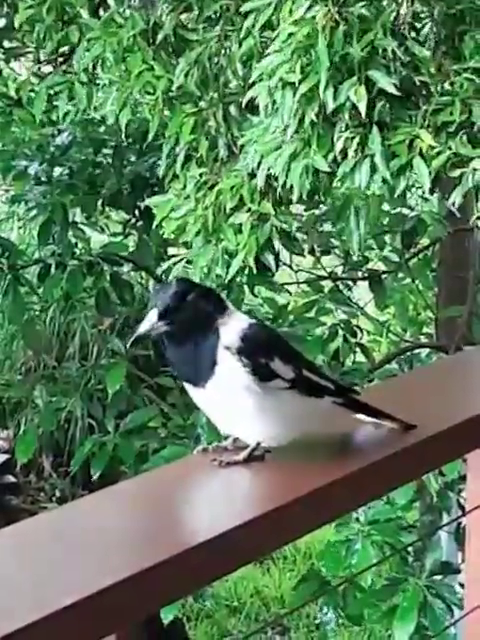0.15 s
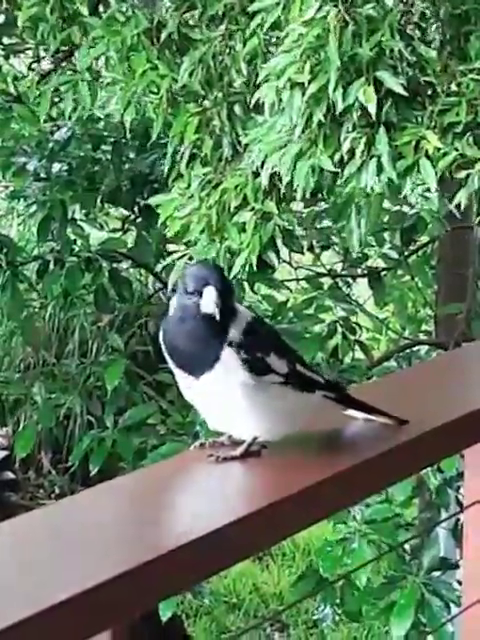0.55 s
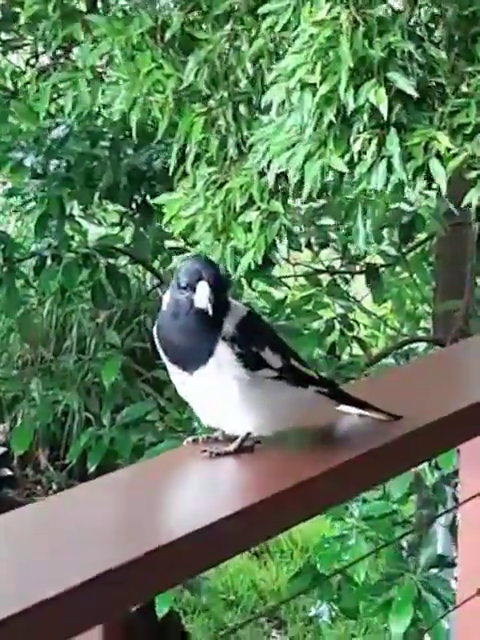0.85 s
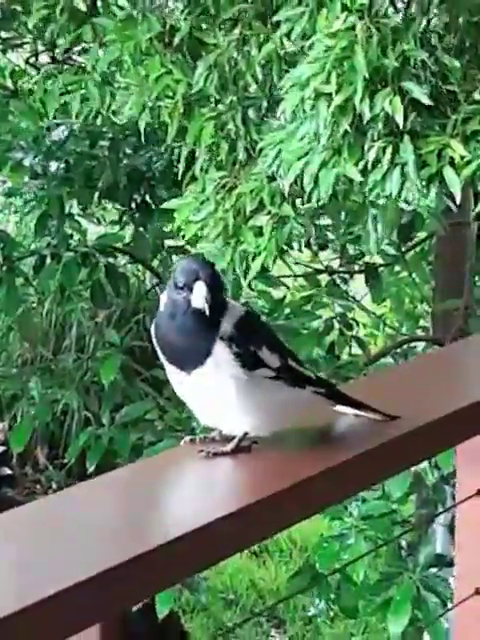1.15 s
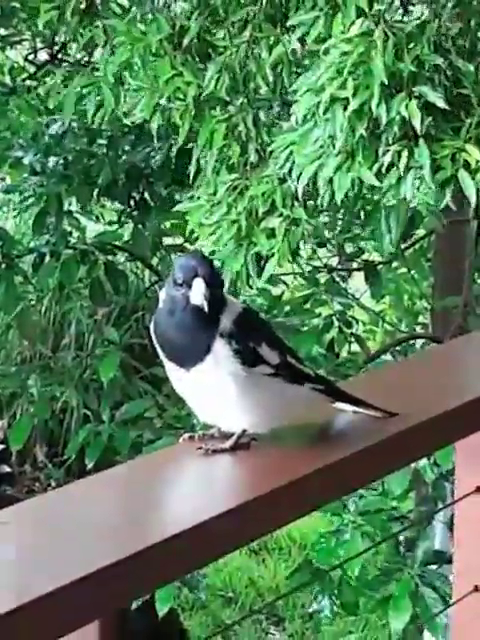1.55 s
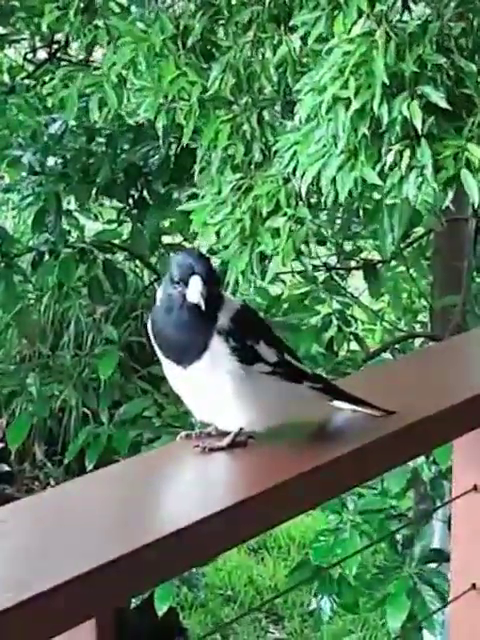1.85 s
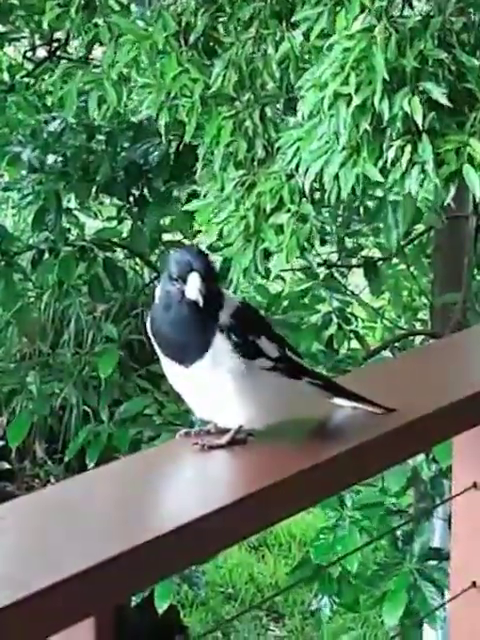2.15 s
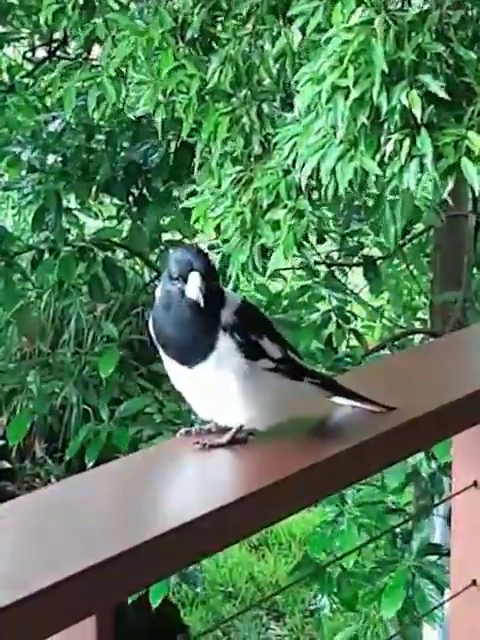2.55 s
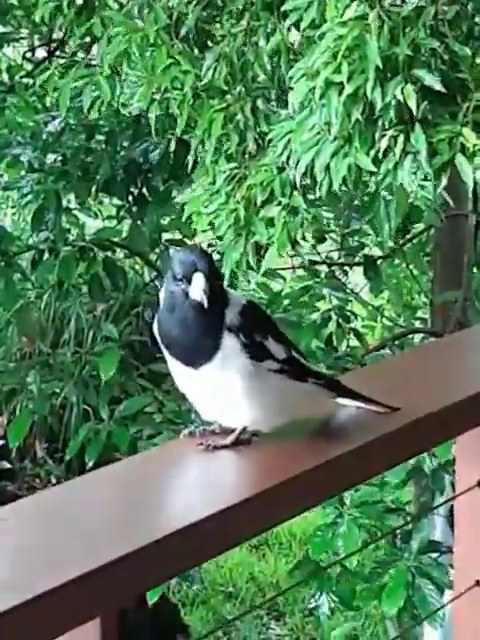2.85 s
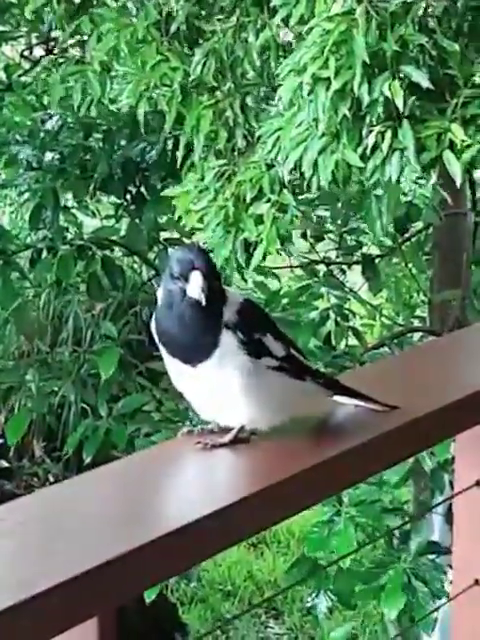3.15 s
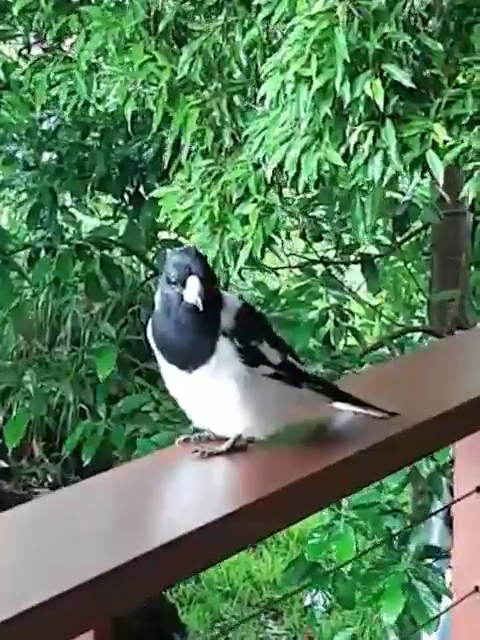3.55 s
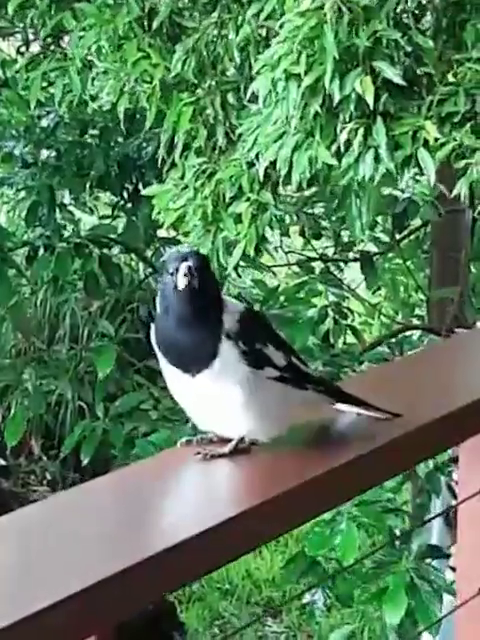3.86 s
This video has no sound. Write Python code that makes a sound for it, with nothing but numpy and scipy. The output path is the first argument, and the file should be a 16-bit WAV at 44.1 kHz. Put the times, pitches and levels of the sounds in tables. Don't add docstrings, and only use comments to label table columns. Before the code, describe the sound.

Bird whistling brief fluty notes on a veranda, ending in a raspy chirp, over distant road drone.

```python
import sys
import numpy as np
from scipy import signal
from scipy.fft import rfft, irfft
from scipy.io import wavfile
from scipy.ndimage import uniform_filter1d

SR = 44100
rng = np.random.default_rng(int(sys.argv[2]) if len(sys.argv) > 2 else 0)


def boost(x):
    u = np.asarray(x, float) / 20
    return 10 ** u


def waveform_to_disk(signal):
    frames = np.transpose(np.atleast_2d(signal))
    scaled = np.clip(frames, -1, 1) * 32767
    samples = np.round(scaled).astype(np.int16)
    wavfile.write(sys.argv[1], SR, samples)


N = 176400


def evened(x):
    return x / np.sqrt(np.mean(abs(x) ** 2) + 1e-20)


def resonate(x, hz, width):
    turn = np.exp(2j * np.pi * hz * np.arange(len(x)) / SR)
    r = np.exp(-np.pi * width / SR)
    return 2 * (turn * signal.lfilter([1 - r], [1, -r], x / turn)).real


def noise_band(hz, width):
    white = rng.standard_normal(N)
    return evened(resonate(resonate(white, hz, width), hz, width))


def slow(t, lo_hz, hi_hz):
    rates = np.geomspace(lo_hz, hi_hz, num=24)
    return evened(sum(np.sin(2 * np.pi * (f * t + rng.random())) / np.sqrt(f) for f in rates))


def fade(t, start, t60):
    return -60 * np.maximum(t - start, 0) / t60


# time in seconds, level in dB.
TRAFFIC_SWELL = [(0, -46), (.1, -46.5), (.25, -44), (.42, -46.5), (.7, -47), (.9, -46), (1.1, -47),
                 (1.3, -46), (1.5, -47), (1.8, -47), (2.1, -46), (2.4, -46), (2.75, -45.5), (3.05, -45.5),
                 (3.4, -47), (3.7, -46), (4, -47)]


def traffic(t):
    s, db = np.transpose(TRAFFIC_SWELL)
    return np.interp(t, s, db - db.mean())


# frequency in Hz, density in dB per Hz.
RUMBLE_SPECTRUM = [(18, -61), (30, -44), (53, -21.5), (130, -2.5), (250, -3), (412, -8), (560, -4),
                   (730, -34), (1230, -120)]
ROAD_SPECTRUM = [(330, -33), (560, -3), (684, -1.5), (1310, -2.5), (1550, 0.5), (1680, -3), (2030, -6.5),
                 (2330, -11), (2900, -13.5), (3770, -46), (6380, -120)]
LEAF_SPECTRUM = [(1710, -32), (2900, 0), (3340, -2.5), (3630, 0), (4150, 2.5), (5150, -3), (7310, -1.5),
                 (7760, -2.5), (8700, -23), (11300, -51), (19100, -120)]
AIR_SPECTRUM = [(5120, -32), (8700, 1), (11200, 2.5), (15500, -6)]
LAYER_EDGES_HZ = [15, 560, 2900, 8700, 15670]


def background():
    frames = N // 256 + 5
    hz = np.fft.rfftfreq(1024, 1 / SR)
    real, imag, patches = rng.standard_normal((frames, 513, 3)).T
    patches = uniform_filter1d(patches, size=10, axis=0)
    patches = evened(uniform_filter1d(patches, size=14, axis=1))
    t = np.arange(frames) * 256 / SR
    swell = slow(t, 0.4, 3.0)
    gusts = slow(t, 2.3, 40)
    # spectrum, level in dB, movement in dB
    layers = [
        (RUMBLE_SPECTRUM, -52, 1.73 * patches + 0.15 * swell),
        (ROAD_SPECTRUM, -46, 0.85 * patches + 0.18 * swell + traffic(t)),
        (LEAF_SPECTRUM, -52.5, 0.97 * patches + 0.1 * swell + 0.23 * gusts),
        (AIR_SPECTRUM, -68, 0.6 * patches + 0.88 * swell + 0.56 * gusts),
    ]
    out = np.zeros(N)
    for k, (spectrum, level_db, moving_db) in enumerate(layers):
        f, db = np.transpose(spectrum)
        inside = (hz >= LAYER_EDGES_HZ[k]) & (hz < LAYER_EDGES_HZ[k + 1])
        colour = boost(np.interp(np.log(hz + 1), np.log(f + 1), db)) * inside
        z = (real + 1j * imag) * colour[:, None] * boost(moving_db)
        layer = signal.istft(z, nperseg=1024, noverlap=768)[1][:N]
        out += boost(level_db) * evened(layer)
    return out


# centre in Hz, width in Hz, level in dB.
MACHINE_DRONES = [(1550, 62, -57), (2022, 106, -60), (250.5, 19.5, -63.5)]


def drones():
    t = np.arange(N) / SR
    out = np.zeros(N)
    for hz, width, db in MACHINE_DRONES:
        drift = slow(t[::64], 0.404, 3.57).repeat(64)[:N]
        out += boost(db + 1.4 * traffic(t) + 1.4 * drift) * noise_band(hz, width)
    return out


def leaf_crackle():
    per_second, level_db, low_cut_hz = 120, -78, 9000
    strength = boost(4.5 * np.minimum(rng.exponential(1, N), 4))
    clicks = strength * (rng.random(N) < per_second / SR)
    clicks = signal.lfilter(*signal.butter(2, low_cut_hz, "high", fs=SR), clicks)
    return boost(level_db) * evened(clicks)


# pitch in Hz, level in dB, 60 dB decay time in seconds.
CLAW_KNOCKS = [(615, -37.5, 0.094), (680, -38, 0.11), (602, -41, 0.14), (148, -47, 0.49),
               (247.3, -42.5, 0.29)]
CLAW_TIMES_S = [2.462, .9, .985, .09, 3.66]


def knocks():
    t = np.arange(N) / SR
    out = np.zeros(N)
    for s, (hz, db, t60) in zip(CLAW_TIMES_S, CLAW_KNOCKS):
        swell = np.clip((t - s) / 0.0053, 0, 1)
        out += boost(db + fade(t, s, t60)) * swell * np.sin(2 * np.pi * hz * t)
    return out


def note(rows, second_db, third_db, halo_db, echo_db):
    waver_depth, halo_width, halo_lag_s, flutter_db = 0.0061, 0.5, 0.026, 4
    s, hz, db = np.transpose(rows)
    t = np.arange(round(s[0] * SR) - 900, min(round(s[-1] * SR) + 3600, N)) / SR
    waver, a, b = rng.standard_normal((3, SR // 2))[:, :len(t)]
    pitch = uniform_filter1d(np.interp(t, s, hz), size=90)
    pitch = pitch * (1 + waver_depth * evened(uniform_filter1d(waver, size=150)))
    phase = 2 * np.pi * np.cumsum(pitch) / SR
    level = uniform_filter1d(boost(np.interp(t, s, db, left=-140, right=-140)), size=60)

    r = np.exp(-np.pi * halo_width * hz.mean() / SR)
    lag = np.exp(-1 / (halo_lag_s * SR))
    fuzz = signal.lfilter([1], [1, -r], a + 1j * b)
    fuzz = evened(signal.lfilter([1], [1, -r], fuzz))
    halo = boost(halo_db) * signal.lfilter([1 - lag], [1, -lag], level) * fuzz

    flutter = uniform_filter1d(uniform_filter1d(b, size=50), size=50)
    flutter = boost(flutter_db * evened(flutter))
    overtones = boost(second_db) * np.exp(2j * phase) + boost(third_db) * np.exp(3j * phase)
    tone = np.exp(1j * phase) + flutter * overtones
    out = np.zeros((2, N))
    out[:, round(t[0] * SR):][:, :len(t)] = np.sqrt(2) * ((level + halo) * tone).real
    return out * boost([[0], [echo_db]])


# delay in seconds, level in dB.
REFLECTIONS = [(.0043, -14.5), (0.011, -11), (0.0215, -9.5), (0.03, -9.5), (0.04, -16), (.0475, -22),
               (0.084, -23)]


def veranda(direct, feed):
    tail_db, tail_t60_s, tail_start_s, scatter_s = -10.5, 0.17, 0.012, 0.0045
    t = np.arange(SR // 2) / SR
    tail = np.zeros(len(t))
    slots = np.arange(0, len(t) - 40, 40)
    spikes = rng.choice([-1., 1.], len(slots)) * rng.exponential(1, len(slots))
    tail[slots + rng.integers(0, 40, len(slots))] = spikes
    tail *= boost(-60 * t / tail_t60_s) * (t > tail_start_s)
    room = boost(tail_db) * tail / np.linalg.norm(tail)
    for delay, db in REFLECTIONS:
        grains = rng.standard_normal(len(t)) * rng.exponential(1, len(t)) ** 2
        cluster = grains * np.exp(-abs(t - delay) / scatter_s)
        room += boost(db) * cluster / np.linalg.norm(cluster)
    return direct + signal.fftconvolve(feed, room)[:N]


# time in seconds, pitch in Hz, level in dB. Opening blip.
OPENING_NOTE = [
    [(2.16, 1000, -48), (2.174, 1002, -34.5), (2.186, 993, -28.5), (2.202, 961, -31.5), (2.211, 958, -52),
     (2.222, 1010, -33.5), (2.238, 1005, -42), (2.256, 1010, -35), (2.272, 1004, -57)],
]
FALLING_NOTE = [
    [(2.476, 1874, -46), (2.483, 1842, -33.5), (2.489, 1782, -23.5), (2.495, 1740, -33), (2.498, 1780, -46),
     (2.501, 1830, -32), (2.505, 1770, -39), (2.508, 1730, -32), (2.51, 1680, -46)],
    [(2.51, 1760, -42), (2.515, 1790, -24), (2.519, 1834, -40), (2.522, 1916, -28), (2.5255, 1750, -42),
     (2.528, 1620, -28), (2.532, 1640, -46)],
    [(2.532, 1650, -38), (2.538, 1589, -17.5), (2.5435, 1524, -22.5), (2.547, 1480, -39), (2.55, 1475, -27),
     (2.554, 1517, -41), (2.562, 1484, -20), (2.568, 1452, -42)],
    [(2.568, 1471, -43), (2.571, 1492, -33), (2.577, 1430, -30), (2.5825, 1413, -43), (2.586, 1405, -27),
     (2.59, 1380, -50), (2.595, 1437, -33), (2.602, 1445, -33), (2.607, 1434, -46)],
    [(2.607, 1435, -47), (2.613, 1426, -26.5), (2.616, 1375, -42), (2.621, 1340, -30), (2.625, 1340, -44),
     (2.63, 1348, -34), (2.646, 1335, -31.5), (2.652, 1293, -48), (2.66, 1320, -58)],
]
HELD_AND_SHORT_NOTES = [
    [(2.82, 1857, -51), (2.833, 1860, -34), (2.842, 1882, -39), (2.852, 1876, -28.5), (2.864, 1826, -15.5),
     (2.8705, 1790, -21.5), (2.876, 1786, -21), (2.8822, 1757, -32)],
    [(2.8822, 1777, -31), (2.886, 1770, -20), (2.891, 1750, -26.5), (2.9, 1770, -25.5), (2.91, 1797, -21),
     (2.917, 1817, -27.5), (2.922, 1815, -23), (2.929, 1878, -37), (2.939, 1926, -48)],
    [(3.182, 1838, -52), (3.189, 1860, -31), (3.195, 1847, -23.5), (3.2015, 1864, -23),
     (3.204, 1824, -21.5), (3.212, 1772, -22.5), (3.217, 1730, -38)],
    [(3.217, 1864, -36), (3.221, 1860, -36), (3.226, 1780, -40), (3.231, 1685, -29), (3.236, 1693, -50),
     (3.243, 1764, -37), (3.248, 1750, -40), (3.254, 1705, -40), (3.262, 1715, -52)],
]
CLOSING_NOTE = [
    [(3.655, 1850, -46), (3.666, 1802, -35), (3.67, 1643, -48), (3.677, 1510, -29), (3.682, 1480, -41),
     (3.69, 1547, -28), (3.698, 1515, -42), (3.704, 1520, -31), (3.711, 1504, -55)],
    [(3.684, 1630, -55), (3.693, 1845, -34), (3.698, 2080, -34.5), (3.703, 2490, -42), (3.712, 2410, -46),
     (3.722, 2745, -44), (3.728, 2726, -65), (3.736, 2790, -44), (3.746, 2760, -54)],
    [(3.733, 3000, -56), (3.741, 3100, -51), (3.75, 3100, -55), (3.762, 3080, -52), (3.768, 3100, -62)],
]
LAST_CHIRP = [
    [(3.79, 4280, -66), (3.797, 4345, -32), (3.8, 4310, -27), (3.8055, 4240, -23), (3.8077, 4400, -41),
     (3.81, 4440, -20), (3.817, 4500, -26.5), (3.824, 4476, -23), (3.827, 4520, -46)],
    [(3.8125, 4266, -44), (3.816, 4155, -22), (3.821, 3850, -31.5), (3.826, 3630, -34.5),
     (3.833, 3340, -48), (3.839, 3190, -62)],
    [(3.829, 2870, -62), (3.835, 2740, -57), (3.843, 2610, -52), (3.848, 2550, -62)],
    [(3.854, 2520, -57), (3.861, 2470, -40), (3.868, 2400, -51), (3.878, 2470, -60)],
]
# second overtone in dB, third overtone in dB, breathy halo in
# dB, echo feed in dB.
PART_COLOURS = [(-26, -43, -8.5, -12), (-50, -55, -8, -1), (-51, -56, -11, -5), (-50, -53, -8, -7.5),
                (-51, -53, -7, -2), (-51, -53, -4.5, -8.5), (-53, -53, -16.5, -10),
                (-48, -55, -16.5, -7.5), (-48, -55, -12.5, -16), (-48, -55, -4, -9),
                (-34, -45, -5.5, -16), (-26, -45, -10, -3.5), (-30, -43, -9, -9), (-19, -29, -14.5, -3),
                (-9.5, -26, -9, 1), (8, -13, -5, -1), (-23, -28, -8, -4)]


def bird():
    shelf_hz, shelf_db = 7660, -16.5
    parts = OPENING_NOTE + FALLING_NOTE + HELD_AND_SHORT_NOTES + CLOSING_NOTE + LAST_CHIRP
    direct, feed = sum(note(rows, *colour) for rows, colour in zip(parts, PART_COLOURS))
    wet = rasp() + veranda(direct, feed)
    hz = np.fft.rfftfreq(N, 1 / SR)
    shelf = boost(shelf_db / (1 + np.exp((shelf_hz - hz) / 120)))
    return irfft(rfft(wet) * shelf, N)


# time in seconds, level in dB.
LEAF_TICKS = [(2.1844, -54), (2.2912, -54), (2.7462, -47.5), (3.1258, -59), (3.6311, -55)]


def ticks():
    tick_t60_s, tail_t60_s, tail_db = 0.008, 0.12, -9
    t = np.arange(N) / SR
    shape = np.zeros(N)
    for s, db in LEAF_TICKS:
        decay = boost(db + fade(t, s, tick_t60_s)) + boost(db + tail_db + fade(t, s, tail_t60_s))
        shape += decay * np.clip((t - s) / 0.0008, 0, 1)
    return shape * noise_band(hz=12800, width=6000)


def rasp():
    start_s, rise_s, t60_s, level_db = 3.8, 0.042, 0.18, -44
    u = np.arange(N) / SR - start_s
    shape = np.clip(u / rise_s, 0, 1) * boost(level_db + fade(u, rise_s, t60_s))
    return shape * noise_band(hz=6060, width=8400)


def scene():
    return (background() + drones() + leaf_crackle() + knocks() + bird() + ticks())[None]


def top_cut(x):
    return signal.sosfilt(signal.butter(12, 15690, fs=SR, output="sos"), x)


def record(dry):
    cut = signal.lfilter(*signal.butter(2, 70, "high", fs=SR), dry)
    return top_cut(cut)


dry = scene()
out = record(dry)
waveform_to_disk(out)
```